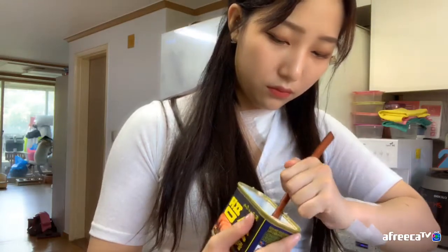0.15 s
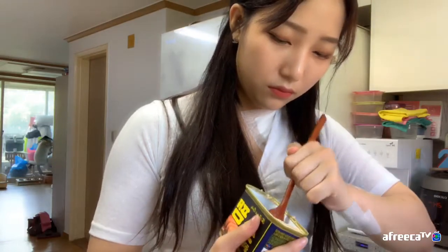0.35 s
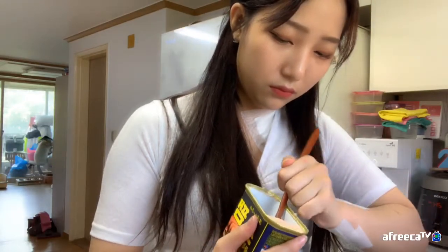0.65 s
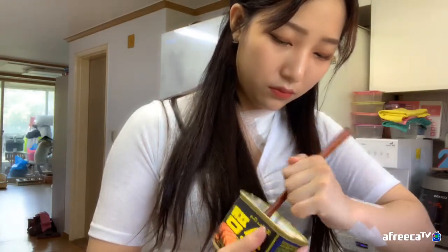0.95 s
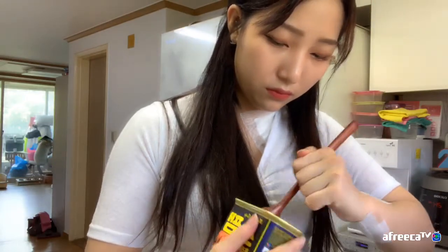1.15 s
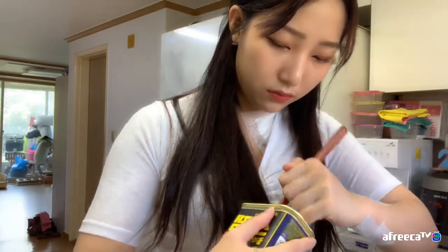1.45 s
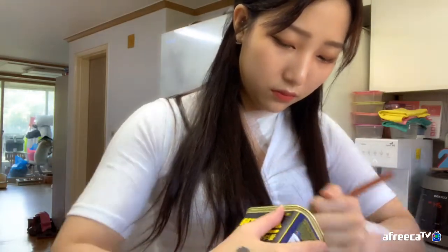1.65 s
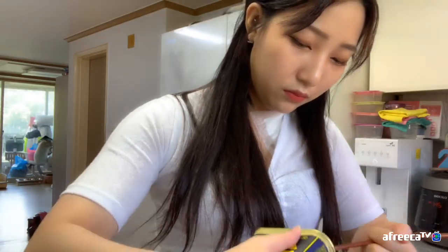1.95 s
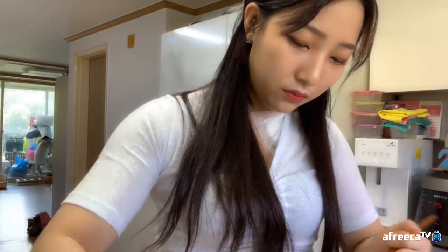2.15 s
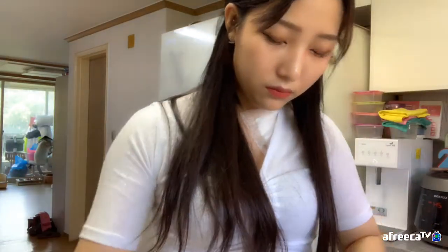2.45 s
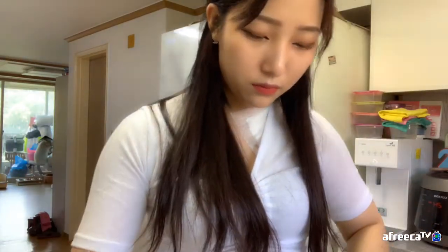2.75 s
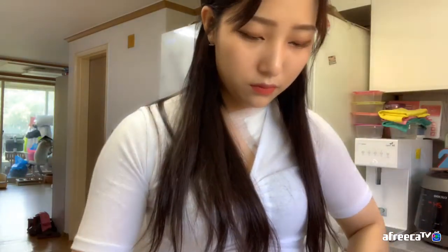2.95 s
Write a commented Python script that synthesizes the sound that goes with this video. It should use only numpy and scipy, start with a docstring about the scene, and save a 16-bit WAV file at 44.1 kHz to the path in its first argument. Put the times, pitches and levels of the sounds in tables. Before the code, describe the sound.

Wooden stick knocking in a small tin, then a wooden knock and ringing bowl clinks on a table.

```python
"""A quiet kitchen hums, rumbles and hisses; a wooden utensil taps and scrapes in a small tin held close.
Then things are put down on the table: a wooden knock, a ringing bowl struck twice, a dull thud between.
Blows ring decaying modes and throw noise cracks; drags and buzzes are dense random grains.
The room adds a short diffuse tail; an appliance's rumble (shaped noise) and hum tones run under it all,
with a treble hiss of shaped noise that opens as the dying tail of an earlier sound."""
import sys
import numpy as np
from scipy import signal
from scipy.fft import rfft, irfft
from scipy.io import wavfile
from scipy.ndimage import uniform_filter1d

SR = 44100
rng = np.random.default_rng(int(sys.argv[2]) if len(sys.argv) > 2 else 0)


def rack_gain(trim_db):
    """Turn a fader trim in dB into the linear factor to multiply a signal by."""
    fader = np.asarray(trim_db, float)
    return 10 ** (fader / 20)


def store_pcm(level_fs):
    """Save levels as 16-bit WAV."""
    pcm = np.round(np.clip(level_fs, -1, 1) * 32767).astype(np.int16)
    wavfile.write(sys.argv[1], SR, np.atleast_2d(pcm).T)


N = 136710

# tin modes: pitch_hz, level_db, t60_s (before the cap)
TIN_MODES = [(659, -18.5, 0.062), (735, -12, 0.047), (867, -10.5, 0.031), (914, -10, 0.025), (941, 2, .06),
             (1047, 0.5, 0.037), (1160, -8.5, 0.028), (1460, -11.5, 0.019), (1850, -14, 0.027),
             (2480, -16.5, 0.014), (2740, -26, 0.038), (3144, -26.5, 0.037), (3720, -34.5, 0.09),
             (4016, -27, 0.021)]
# bowl modes: pitch_hz, level_db, t60_s (before the cap)
BOWL_MODES = [(738, -11, .4), (1030, -10, .06), (1850, -1, .6), (3319, -17, .9), (5130, -13, .9),
              (5545, -21, .1), (6094, -17, .06), (6584, -8, .07), (6729, -12, .2), (6860, -13, .16),
              (6929, -11, .24), (6980, -9, .22), (7060, -13, .16), (7136, -8, .2), (7178, -5, .19),
              (7250, -10, .3), (7400, -13, .16), (7560, -16, .14), (7714, -19, .15), (8100, -17, .4),
              (8414, -24, .25), (9383, -18, .1)]
# table modes: pitch_hz, level_db, t60_s (before the cap)
TABLE_MODES = [(110, -3, .3), (150, -8, .2), (192, 0, .25), (240, -8, .12), (300, -9, .12), (361, -6, .12),
               (430, -11, .08), (480, -11, .08), (533, -6, .08), (620, -11, .06), (734, -12, .06),
               (860, -14, .04), (1000, -14, .04), (1270, -15, .04), (1600, -17, .03)]
# bowl contact noise spectrum: freq_hz, relative_db
BOWL_NOISE = [(300, -7.5), (800, -0.5), (1600, 9), (3000, -1), (5000, 1), (7000, -2.5), (8500, -2),
              (10000, -23)]
# table contact noise spectrum: freq_hz, relative_db
TABLE_NOISE = [(150, -4.5), (500, -8), (1200, 4), (2500, 1.5), (4000, -6.5), (6000, -14.5), (8000, -18),
               (10000, -37)]


def unit(x):
    """Scale to rms 1."""
    return x / np.sqrt(np.mean(x ** 2))


def coloured(x, points):
    """Filter by (Hz, dB) points, interpolated over log frequency."""
    hz, db = np.array(points, float).T
    f = np.fft.rfftfreq(len(x), 1 / SR) + 1
    gain = rack_gain(np.interp(np.log(f), np.log(hz), db))
    return irfft(rfft(x) * gain, len(x))


def tilted(points, db_per_octave):
    """Tilt a (Hz, dB) spectrum about 2 kHz."""
    return [(hz, db + db_per_octave * np.log2(hz / 2000)) for hz, db in points]


def walk(rate_hz):
    """Slow smoothed noise of rms 1."""
    hold = int(SR / rate_hz)
    steps = np.repeat(rng.standard_normal(N // hold + 1), hold)
    smooth = uniform_filter1d(uniform_filter1d(steps, hold), hold)
    return unit(smooth[:N])


def add(out, start_s, x):
    """Mix x in from start_s."""
    i = int(start_s * SR)
    out[i:i + len(x)] += x[:len(out) - i]


def strikes(rows, modes, crack, ref_hz, rise_s, crack_s, longest_s, detune, muted_db=0, free_hz=1e5):
    """Each blow rings modes in its own balance plus a noise crack; a touch damps modes under free_hz."""
    scatter_db, touch_s, crack_rise_s = 1.0, 0.0024, 0.00021
    out, t = np.zeros(N), np.arange(SR // 2) / SR
    hz, db, t60_s = np.array(modes, float).T[:, :, None]
    sign = (-1.) ** np.arange(len(hz))[:, None]
    for row in rows:
        start_s, ring_db, ring_tilt, crack_db, crack_tilt = row[:5]
        level_draw, pitch_draw = rng.standard_normal((2,) + hz.shape)
        gain = sign * rack_gain(ring_db + db + ring_tilt * np.log2(hz / ref_hz) + scatter_db * level_draw)
        decay = 1000. ** (-t / np.minimum(t60_s, longest_s))
        ring = gain * decay * np.sin(2 * np.pi * hz * (1 + detune * pitch_draw) * t)
        if len(row) > 5:
            touch = np.clip((t - row[5]) / touch_s, 0, 1)
            ring = ring * rack_gain(muted_db * (hz < free_hz) * touch)
        body = ring.sum(axis=0) * (1 - np.exp(-t / rise_s))
        noise = unit(coloured(rng.standard_normal(len(t)), tilted(crack, crack_tilt)))
        burst = np.exp(-t / crack_s) * (1 - np.exp(-t / crack_rise_s))
        add(out, start_s, body + rack_gain(crack_db) * noise * burst)
    return out


def grains(rows, modes, rasp, fade, longest_s):
    """Dense stick-slip grains of uneven size ring the body and rasp; fade is a share of the length."""
    rise_s = .007
    t, ring, grit = np.arange(N) / SR, np.zeros(N), np.zeros(N)
    chance = rng.random(N)
    size = rng.standard_normal(N) * rack_gain(1.2 * rng.exponential(size=N))
    for start_s, length_s, ring_db, rasp_db, grains_per_s, tilt in rows:
        rise = np.clip((t - start_s) / rise_s, 0, 1)
        fall = np.clip((start_s + length_s - t) / (fade * length_s), 0, 1)
        hit = chance < grains_per_s / SR
        push = rise * fall * hit * size * np.sqrt(SR / grains_per_s)
        ring = ring + rack_gain(ring_db) * push
        grit = grit + rack_gain(rasp_db) * coloured(push, tilted(rasp, tilt))
    k = np.arange(SR // 4) / SR
    body = sum(rack_gain(db) * 1000. ** (-k / min(t60_s, longest_s)) * np.sin(2 * np.pi * hz * k)
               for hz, db, t60_s in modes)
    return signal.fftconvolve(ring, body / np.linalg.norm(body))[:N] + grit


def kitchen():
    """Shaped noise with a drifting rumble and treble, and the appliance's narrow wavering hum tones."""
    # noise spectrum: freq_hz, relative_db
    floor_points = [(15, -51), (25, -13), (54, -7), (81, -5.5), (129, -1.5), (183, -8), (202, -7.5),
                    (273, -23), (350, -16), (387, -24), (509, -21), (739, -29.5), (1600, -33.5),
                    (7670, -52.5), (9600, -51.5), (12500, -101), (21100, -120)]
    # hum tones: pitch_hz, level_db, width_hz
    hum_tones = [(126.4, -56, 10), (177.9, -49, 7.3), (351.2, -67.5, 7.3), (511, -66.5, 15),
                 (660, -73.5, 12)]
    # treble hiss course, opening with the dying tail of an earlier sound:
    # time_s, level_db (mean removed below)
    hiss_course = [(0, -57.5), (.09, -61), (.25, -70), (.8, -67.5), (1.2, -72.5), (1.7, -74.5),
                   (2.2, -75.5), (2.7, -71.5), (3.1, -56.5)]
    # rumble and hum course: time_s, level_db (mean removed below)
    rumble_course = [(0.0, -41), (0.21, -43.5), (0.57, -41), (0.75, -44.5), (1.48, -47.5), (1.84, -49),
                     (2.47, -42), (2.61, -44), (2.7, -40.5)]
    t = np.arange(N) / SR

    def relative_db(course):
        time_s, db = np.array(course).T
        return np.interp(t, time_s, db) - np.mean(db)

    air = rack_gain(-41.5) * unit(coloured(rng.standard_normal(N), floor_points))
    low = coloured(air, [(220, -9.5), (300, -55.5)])
    high = coloured(air, [(1000, -37.5), (2500, -3.5)])
    middle = air - low - high
    hiss = high * rack_gain(relative_db(hiss_course) + .8 * walk(13.1))
    for hz, db, width_hz in hum_tones:
        level = rack_gain(db + 2.2 * walk(width_hz)) * np.sqrt(2)
        pitch_hz = hz + 0.3085 * width_hz * walk(width_hz)
        low = low + level * np.sin(2 * np.pi * np.cumsum(pitch_hz) / SR)
    return middle + hiss + low * rack_gain(relative_db(rumble_course) + 1.5 * walk(13))


def tin_taps():
    """Utensil taps ring short tin modes until the contact damps them."""
    # start_s, ring_db, ring_tilt_db_per_octave, crack_db, crack_tilt_db_per_octave, damped_after_s
    taps = [(.0915, -18, -9.5, -25, 1, 0.078), (.128, -54, -1, -45, -27, 0.018),
            (.357, -43.5, 0, -62, -3, .015), (.488, -18.5, -9.5, -33.5, -1.5, 0.01),
            (.501, -28.5, 5, -41, 8, 0.021), (.524, -21.5, -11, -34.5, -9.5, 0.013),
            (.627, -52, -20, -52, 0.5, 0.015), (.888, -28, 10.5, -36.5, 1, 0.0035),
            (.8985, -20, 4.5, -25, -3, 0.015), (.911, -24.5, 15.5, -28, -5.5, .01),
            (.921, -18, 0, -52, -7, 0.022), (1.086, -21.5, -3.5, -53, 0, 0.029),
            (1.292, -39, -16, -59, -11, 0.019), (1.389, -34.5, 0.5, -56, -5, 0.012),
            (1.408, -37, -0.5, -66, -3, 0.017), (1.446, -33.5, 0, -66, -2, 0.016),
            (1.580, -49.5, 3, -62, 12, 0.011)]
    # contact noise spectrum: freq_hz, relative_db
    tin_noise = [(300, -1), (800, -1), (1500, 4.5), (3000, 2.5), (5000, 5), (7000, 0), (8500, -6),
                 (10000, -46)]
    return strikes(taps, TIN_MODES, tin_noise, ref_hz=990, rise_s=0.0015, crack_s=0.0046,
                   longest_s=.07, detune=0.012, muted_db=-13)


def tin_scrapes():
    """The utensil drags along the tin wall: stick-slip grains ring it and rasp."""
    # start_s, length_s, ring_db, rasp_db, grains_per_s, rasp_tilt_db_per_octave
    drags = [(.495, 0.021, -36, -53.5, 4400, 2), (.54, 0.066, -70, -67, 2700, 6),
             (.625, 0.12, -50, -57.5, 5200, 4.5), (.882, .066, -34, -25.5, 3500, -1.5),
             (.95, 0.043, -50.5, -58, 3000, 4), (1.11, 0.045, -57, -70, 3100, 1.5),
             (1.29, 0.024, -46.5, -60, 6100, -3.5), (1.383, 0.039, -46.5, -65, 3000, 7),
             (1.443, .035, -49, -54.5, 2600, 2), (2.201, 0.25, -76, -66, 3000, 5),
             (2.5, 0.19, -74, -76.5, 3300, 6.5)]
    # rasp spectrum: freq_hz, relative_db
    rasp_points = [(300, -16), (700, -5), (1300, -1), (1900, 0), (2700, 0), (4000, -7), (6000, -11),
                   (8000, -13), (10000, -22)]
    return grains(drags, TIN_MODES, rasp_points, fade=0.54, longest_s=.07)


def utensil_drops():
    """The utensil is laid down and bounces, ringing its own damped modes."""
    # start_s, ring_db, ring_tilt_db_per_octave, crack_db, crack_tilt_db_per_octave
    bounces = [(2.731, -16, -0.87, -15.5, 0.48), (2.746, -47, -1.1, -37.5, -3),
               (2.826, -29.5, -2.9, -34.5, 1)]
    # utensil modes: pitch_hz, level_db, t60_s (before the cap)
    stick_modes = [(105.4, -9, 0.9), (475, -10, 0.06), (700, -18.5, 0.088), (1077, -0.5, 0.046),
                   (1258, 8, 0.018), (1640, -11.5, 0.11), (1760, -19, 0.013), (2550, -4.5, 0.017),
                   (2890, -7.5, 0.1), (3640, -31.5, 0.036)]
    return strikes(bounces, stick_modes, TABLE_NOISE, ref_hz=1200, rise_s=0.00042, crack_s=0.0063,
                   longest_s=.08, detune=0.021)


def bowl_clinks():
    """Blows ring the bowl's long modes; a touch mutes those under 6 kHz."""
    # start_s, ring_db, ring_tilt_db_per_octave, crack_db, crack_tilt_db_per_octave, muted_after_s
    clinks = [(2.878, -14, -1.5, -12.5, 1, .060), (2.891, -29.5, 1, -20.5, 1, .047),
              (3.069, -16.5, 0.5, -11, -3.3, .2), (3.083, -33, -8.5, -25.5, -2, .2)]
    return strikes(clinks, BOWL_MODES, BOWL_NOISE, ref_hz=2000, rise_s=0.00032, crack_s=0.0049,
                   longest_s=3., detune=0, muted_db=-9.5, free_hz=6000)


def bowl_buzzes():
    """The bowl buzzes against what it touches: grains ring its modes above 6 kHz."""
    # start_s, length_s, ring_db, rasp_db, grains_per_s, rasp_tilt_db_per_octave
    buzzes = [(2.879, 0.15, -35, -39.5, 3000, 0.0032), (3.07, .06, -32, -30.5, 3000, 0)]
    high_modes = [mode for mode in BOWL_MODES if mode[0] > 6000]
    return grains(buzzes, high_modes, BOWL_NOISE, fade=1.0, longest_s=0.082)


def table_knocks():
    """Blows on the table ring its low, damped modes."""
    # start_s, ring_db, ring_tilt_db_per_octave, crack_db, crack_tilt_db_per_octave
    knocks = [(2.884, -19.5, -4, -50.5, 7), (2.937, -20.5, -0.5, -13.5, -0.5), (2.942, -16, 8, -16.5, -6.5),
              (2.962, -22.5, 13.5, -40.5, -2), (3.074, -21, -3.5, -30, -9.5), (3.088, -35.5, -14, -61, 2)]
    return strikes(knocks, TABLE_MODES, TABLE_NOISE, ref_hz=400, rise_s=0.0017, crack_s=0.012,
                   longest_s=.18, detune=0.016)


def table_rattle():
    """The bowl rattles on the table: dense grains ring the tabletop."""
    # start_s, length_s, ring_db, rasp_db, grains_per_s, rasp_tilt_db_per_octave
    rattles = [(2.938, .125, -26, -27, 3000, 0)]
    return grains(rattles, TABLE_MODES, TABLE_NOISE, fade=0.85, longest_s=.09)


def room(x):
    """A diffuse noise tail that dies band by band."""
    # tail bands: centre_hz, t60_s, relative_db
    bands = [(120, 0.64, -31), (290, 0.63, -4.5), (756, 0.25, -9), (1500, 0.23, -6), (3000, 0.24, -17.5),
             (5500, .3, -19.5), (9170, 0.15, -13.5)]
    t, tail = np.arange(SR // 2) / SR, 0
    onset = np.clip((t - .003) / .004, 0, 1)
    for hz, t60_s, db in bands:
        sos = signal.butter(2, [hz / 1.5, min(hz * 1.5, 12000)], "band", fs=SR, output="sos")
        band = signal.sosfilt(sos, rng.standard_normal(len(t))) * 1000. ** (-t / t60_s) * onset
        tail = tail + rack_gain(db) * band / np.linalg.norm(band) * np.sqrt(hz / SR)
    return rack_gain(8.5) * signal.fftconvolve(x, tail)[:N]


def scene():
    """Tin, utensil, bowl and table in the room, over the kitchen noise."""
    background = kitchen()
    tin = tin_taps() + tin_scrapes()
    table = utensil_drops() + bowl_clinks() + bowl_buzzes() + table_knocks() + table_rattle()
    # dips around the main rings keep the random room tail from ringing on too strongly
    tin_send = coloured(tin, [(500, 0), (950, -10), (1500, 0)])
    table_send = coloured(table, [(700, 0), (1200, -5), (1850, -9), (2400, 0)])
    return (tin + table + room(tin_send + table_send) + background)[None]


def roll_off(x):
    """The treble ends steeply here."""
    return signal.sosfilt(signal.butter(12, 9750, fs=SR, output="sos"), x)


def record(dry):
    """The microphone rounds peaks and cuts the top."""
    rounded = np.tanh(1.1 * dry) / 1.1
    lowpass = signal.ellip(8, .2, 70, 9700, fs=SR, output="sos")  # ripple dB, stop dB, edge Hz
    mix = signal.sosfilt(lowpass, rounded)
    return roll_off(mix)


dry = scene()
out = record(dry)
store_pcm(out)
```